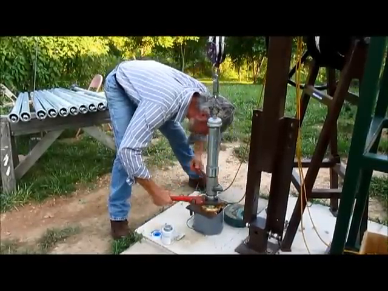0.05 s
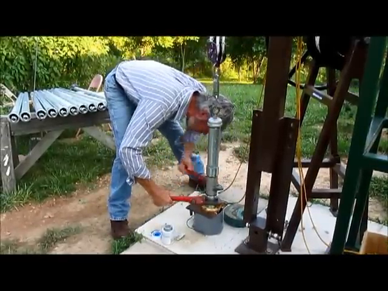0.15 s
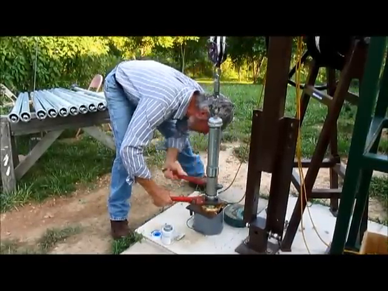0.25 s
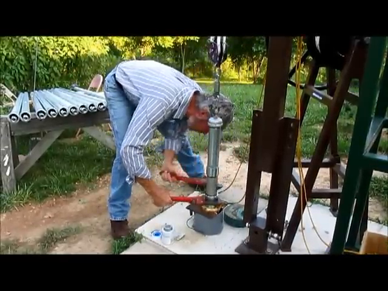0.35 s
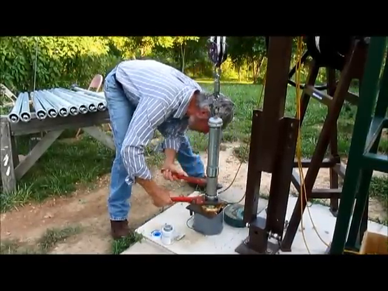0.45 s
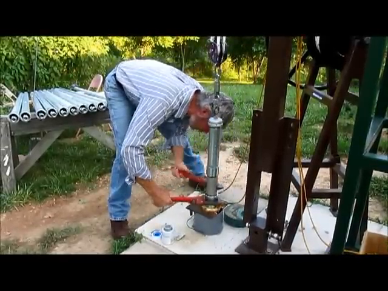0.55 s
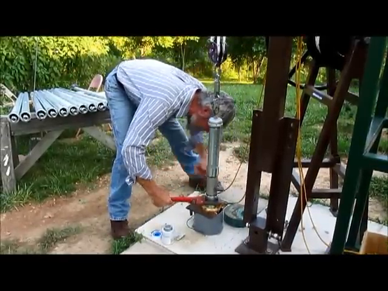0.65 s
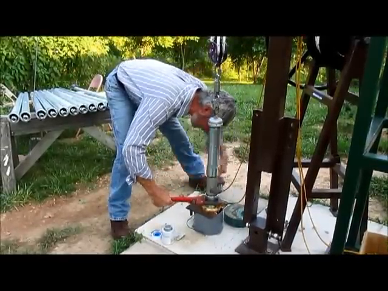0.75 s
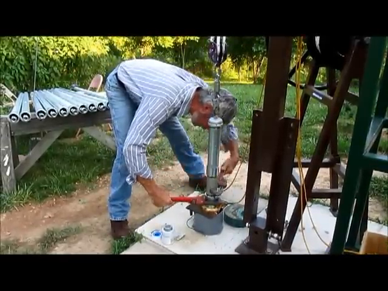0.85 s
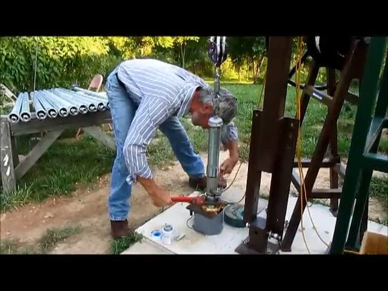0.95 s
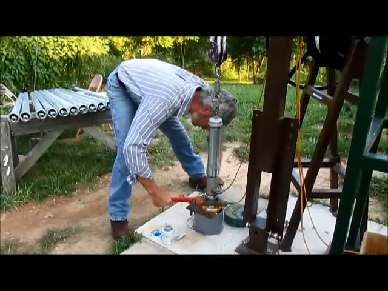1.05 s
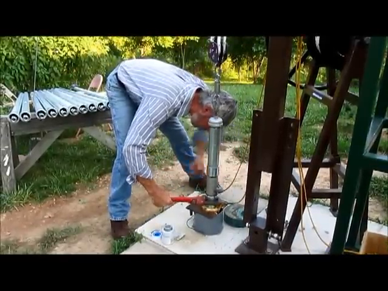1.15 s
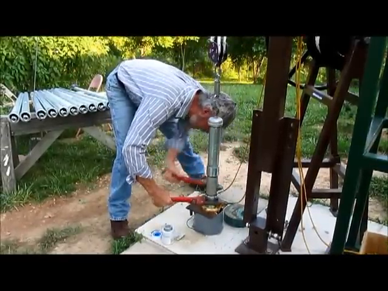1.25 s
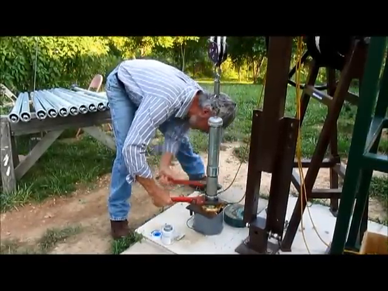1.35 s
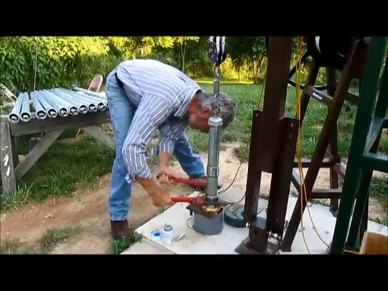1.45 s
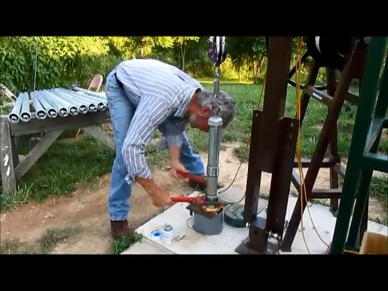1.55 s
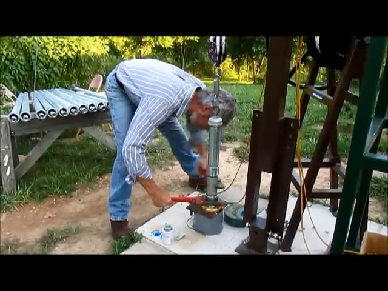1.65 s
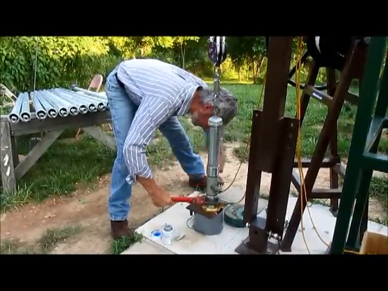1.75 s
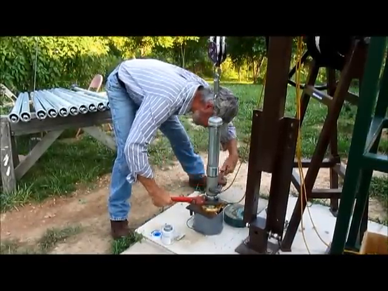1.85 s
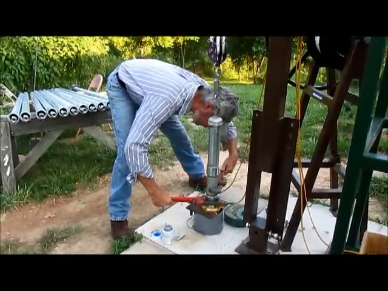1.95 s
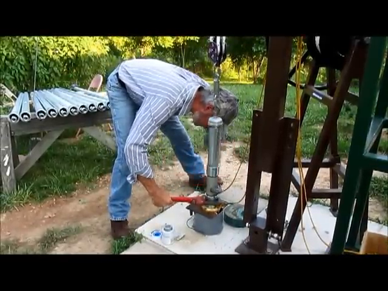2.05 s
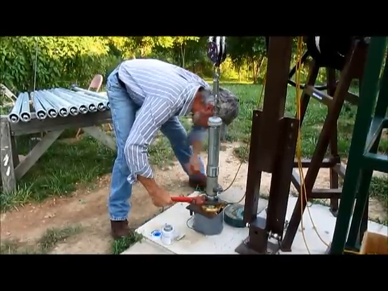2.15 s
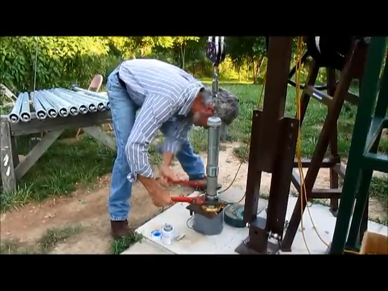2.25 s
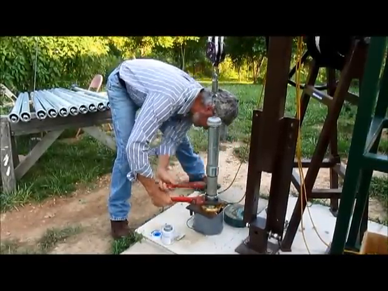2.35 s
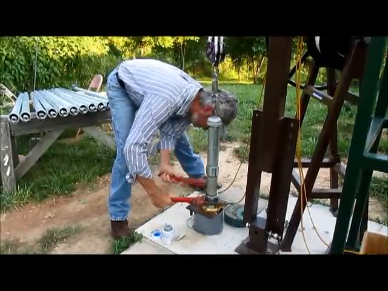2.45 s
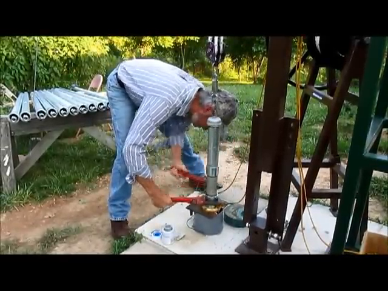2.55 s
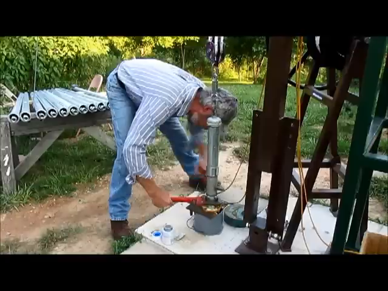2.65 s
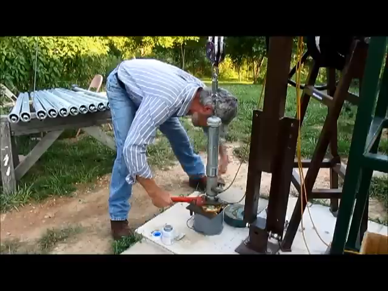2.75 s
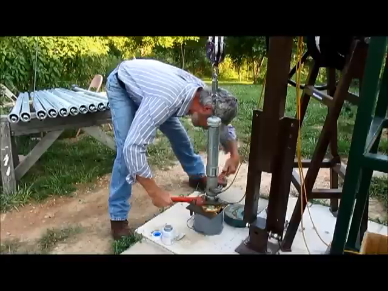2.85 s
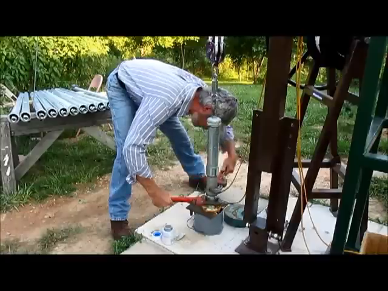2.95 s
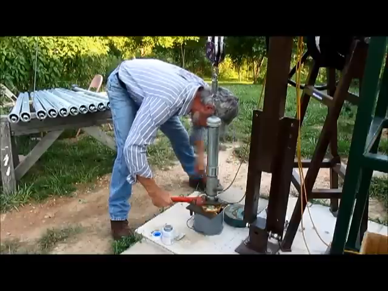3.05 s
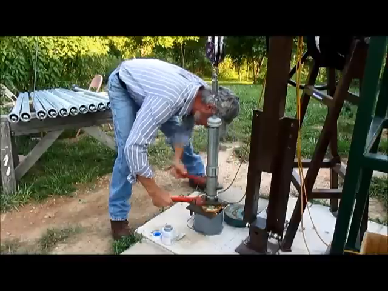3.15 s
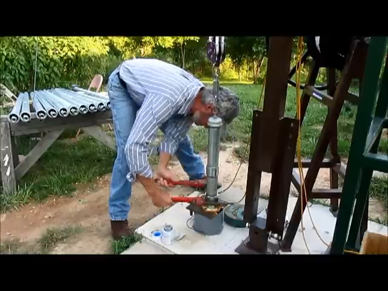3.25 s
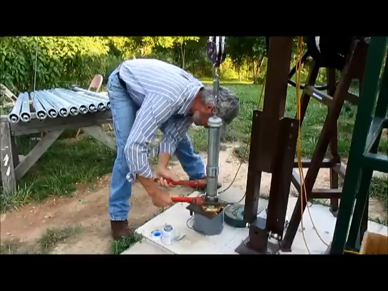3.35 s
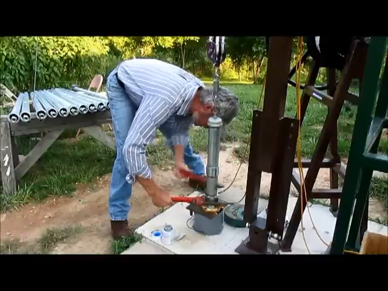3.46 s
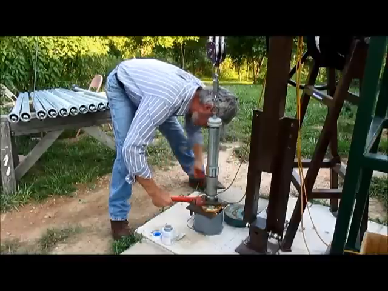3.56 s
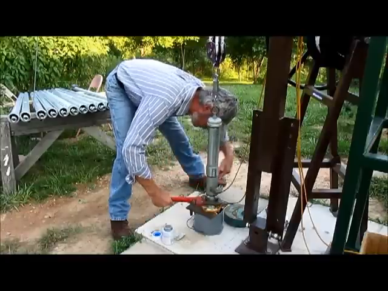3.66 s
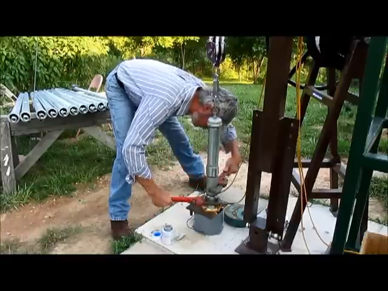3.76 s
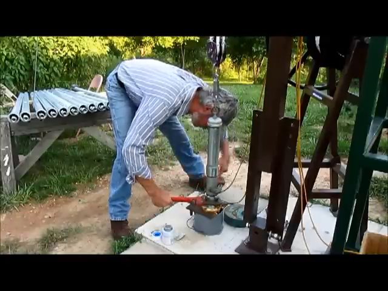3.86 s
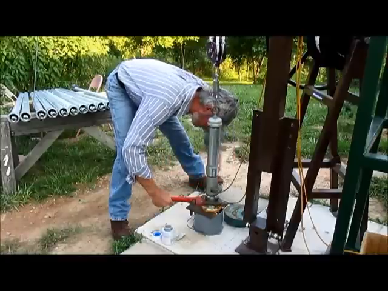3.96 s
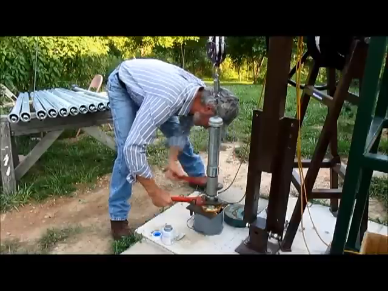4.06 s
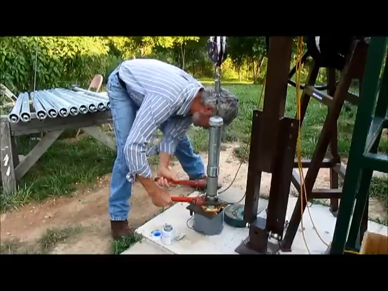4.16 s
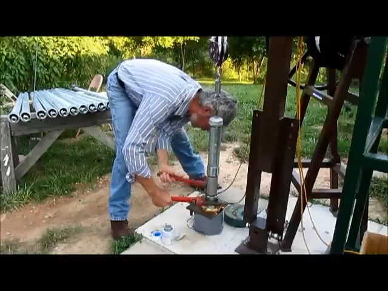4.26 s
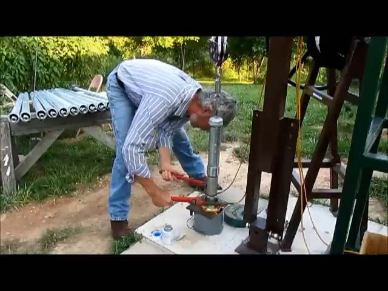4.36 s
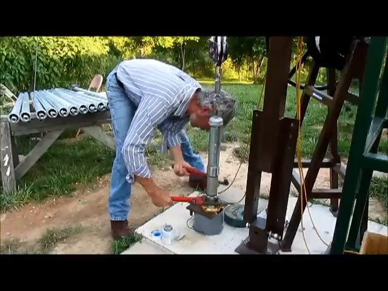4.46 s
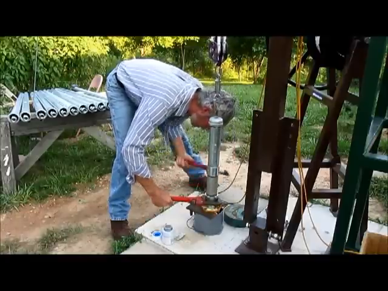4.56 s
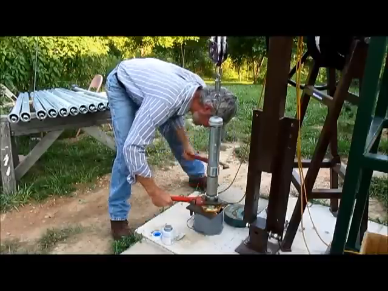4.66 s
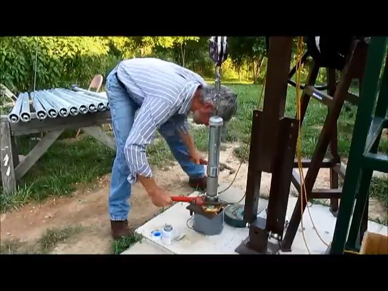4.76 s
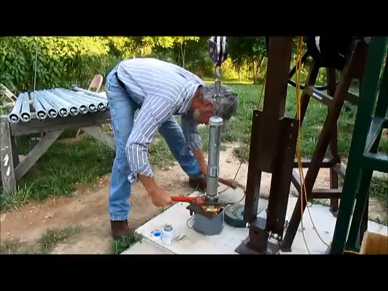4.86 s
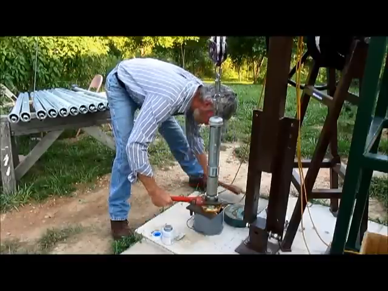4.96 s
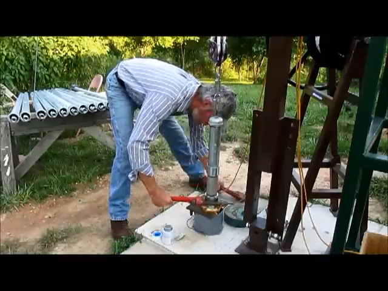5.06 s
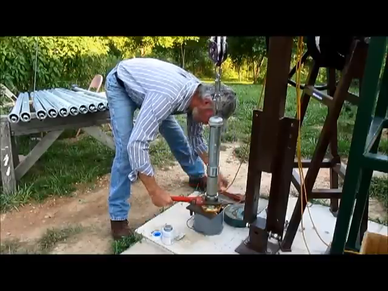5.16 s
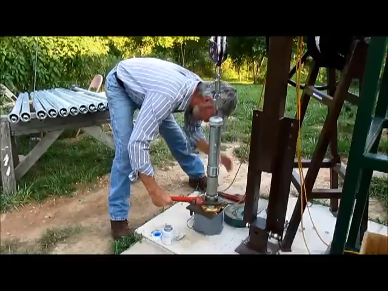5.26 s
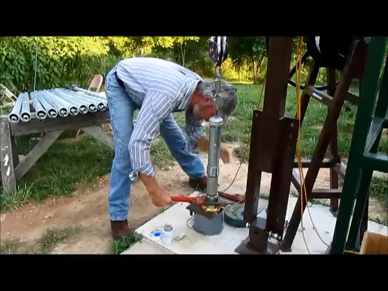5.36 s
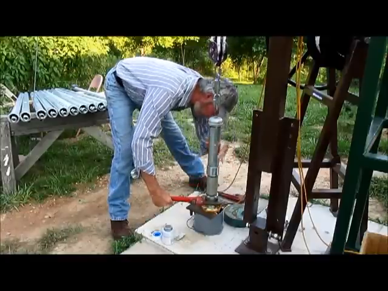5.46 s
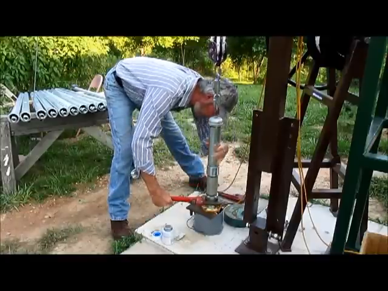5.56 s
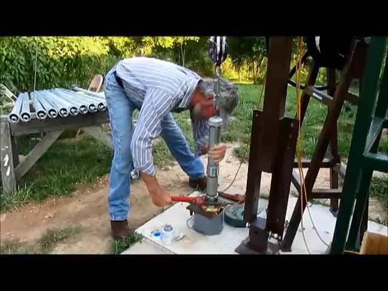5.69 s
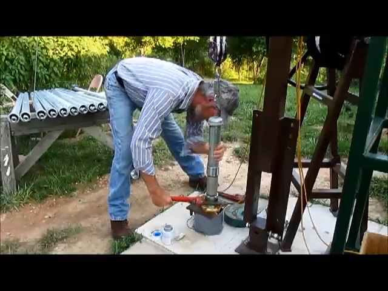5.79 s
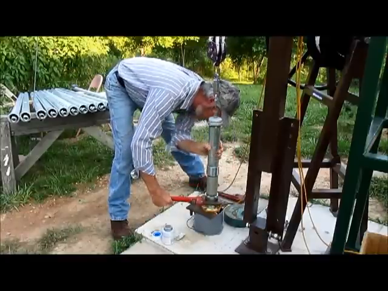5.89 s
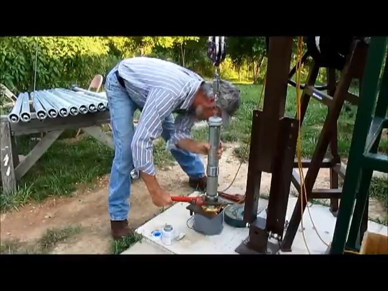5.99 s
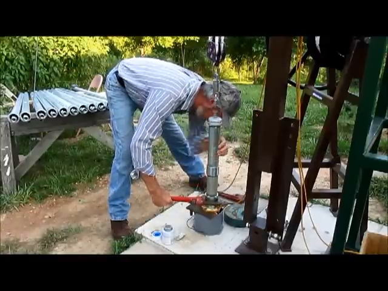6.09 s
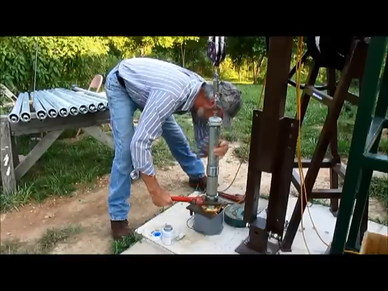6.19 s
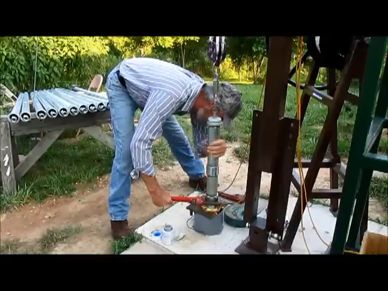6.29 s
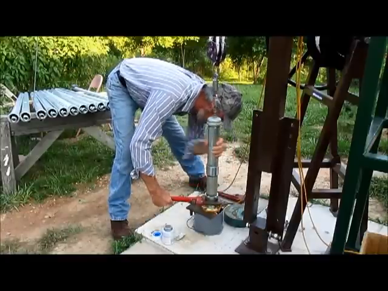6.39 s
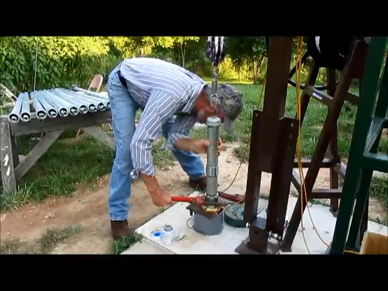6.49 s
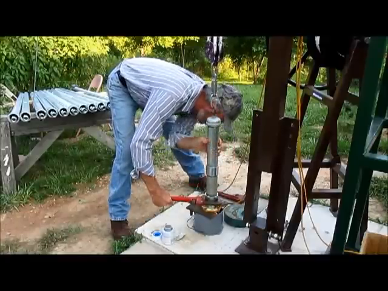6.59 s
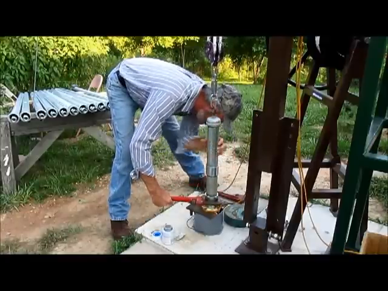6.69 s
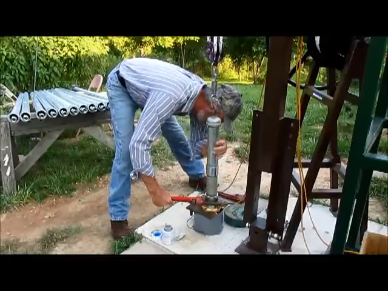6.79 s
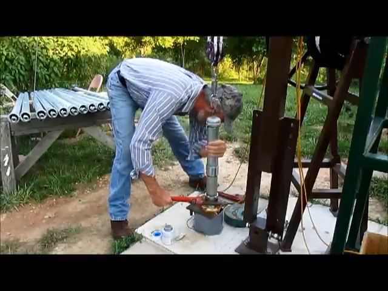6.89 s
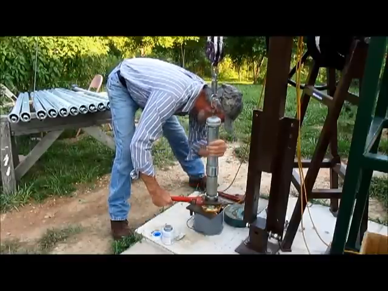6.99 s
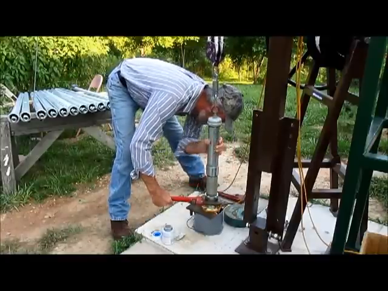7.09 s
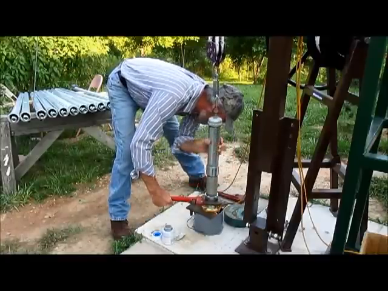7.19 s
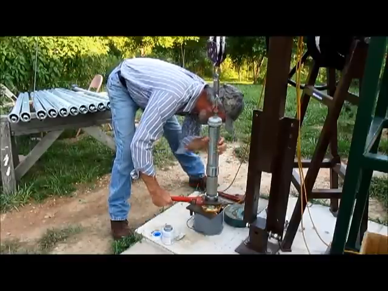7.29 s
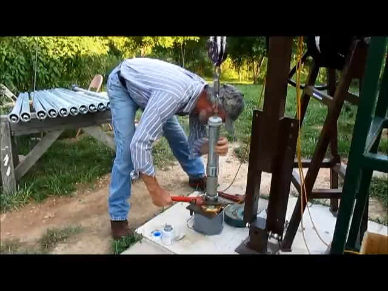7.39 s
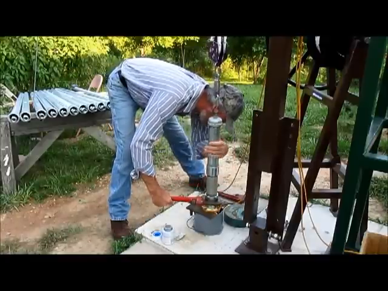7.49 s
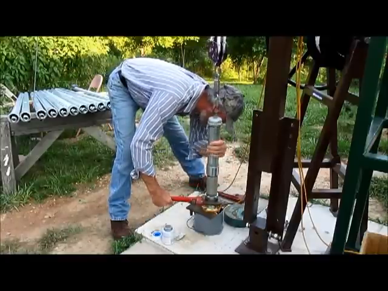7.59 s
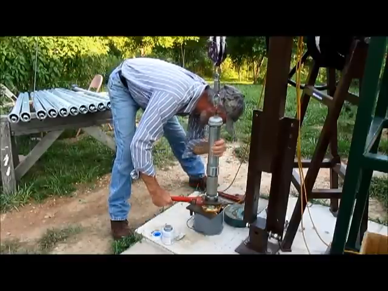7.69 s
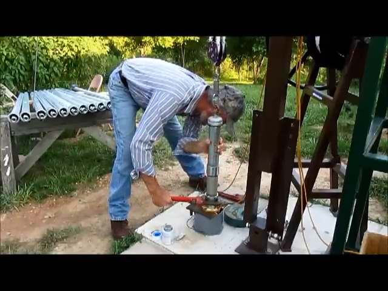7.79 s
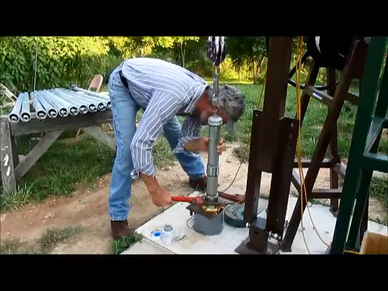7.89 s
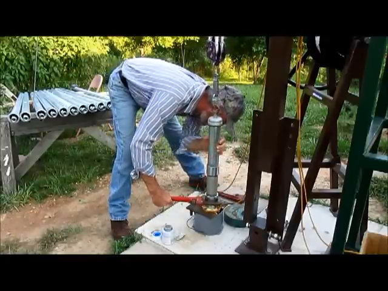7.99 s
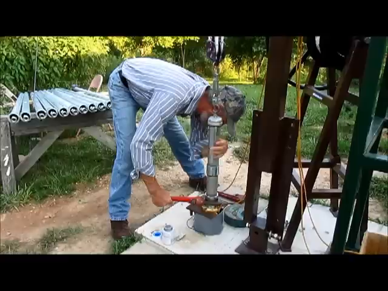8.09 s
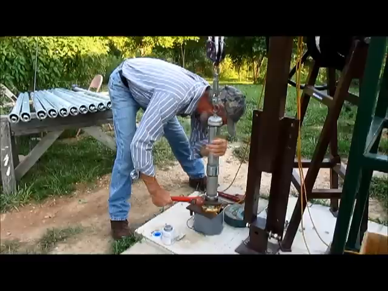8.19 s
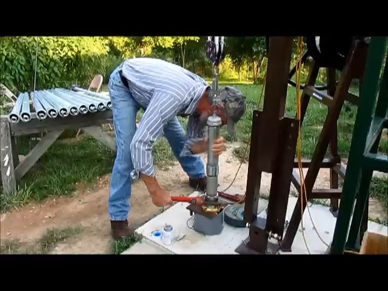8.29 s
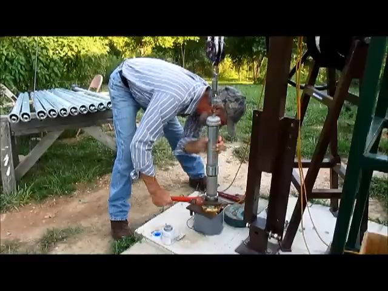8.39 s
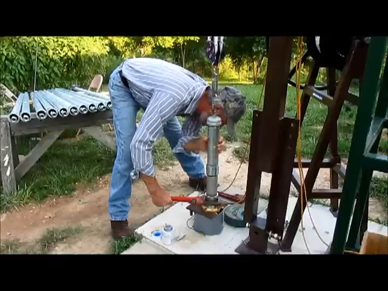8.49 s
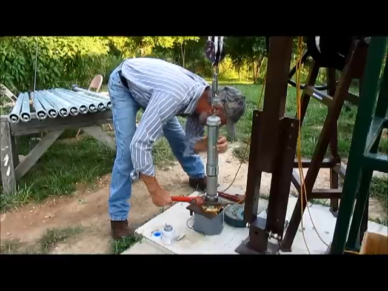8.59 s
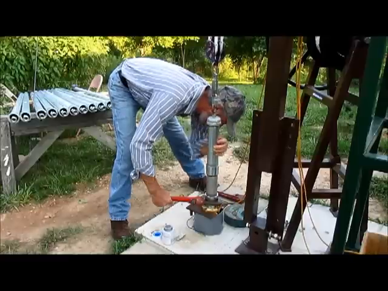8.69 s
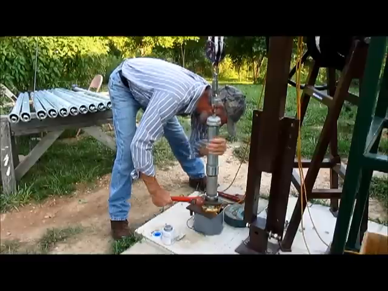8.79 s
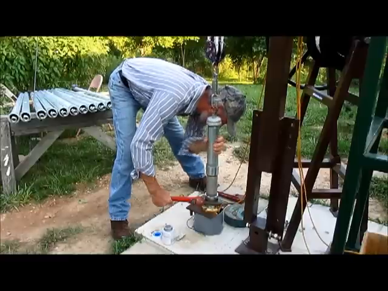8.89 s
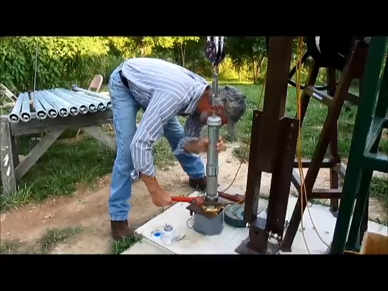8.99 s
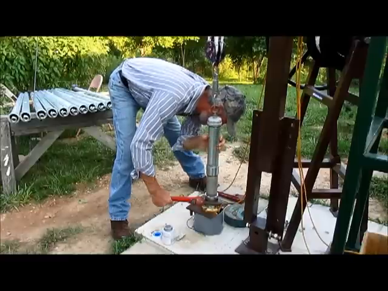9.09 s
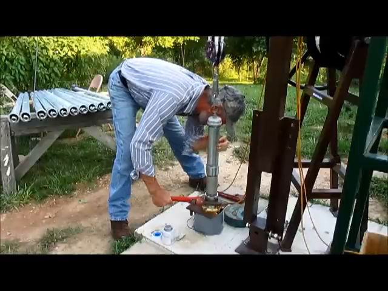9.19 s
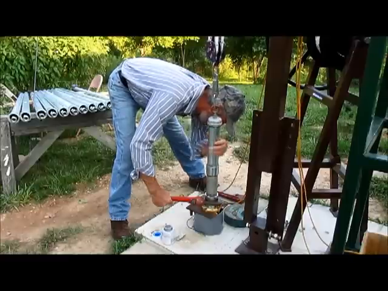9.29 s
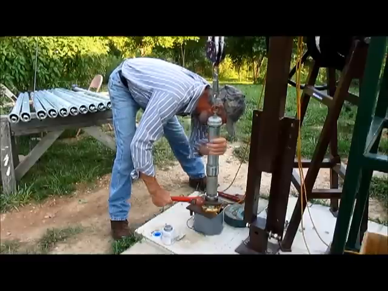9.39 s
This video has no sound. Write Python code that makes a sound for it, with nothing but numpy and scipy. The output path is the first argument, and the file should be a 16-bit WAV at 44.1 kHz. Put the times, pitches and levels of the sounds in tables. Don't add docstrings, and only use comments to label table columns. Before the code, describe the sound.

Crickets trill steadily over soft leafy air and a low hum. Close by, a pipe wrench bites, skids and clanks on a steel pipe in four uneven hauls. It drops hard on concrete with a bright ring and quick bounces. Then a hand spins a loose fitting in short, quieter grinding and knocking turns, ending with a sharp clank. Small stereo camera a few metres away, outdoors.

```python
import sys
import numpy as np
from scipy import signal
from scipy.fft import rfft, irfft
from scipy.io import wavfile
from scipy.ndimage import uniform_filter1d

SR = 44100
rng = np.random.default_rng(int(sys.argv[2]) if len(sys.argv) > 2 else 0)


def ratio(d):
    e = np.asarray(d, float) / 20
    return 10 ** e


def dump_mix(stems):
    frames = np.atleast_2d(stems).T
    limited = np.clip(frames, -1, 1)
    pcm = np.round(limited * 32767).astype(np.int16)
    wavfile.write(sys.argv[1], SR, pcm)


N = 416289

# f/Hz, level/dB, T60/s
PIPE_MODES = [(239, 2.5, 0.079), (400, -11, 0.27), (508, 2, 0.057), (791, 1.5, 0.066), (983, 0.5, 0.063),
              (1306, 8.5, 0.0085), (1847, 4.5, 0.0074), (2590, -27, 0.0038), (2463, -3.5, 0.058),
              (3200, 3.5, 0.0088), (3650, 0.5, 0.025), (3947, -2.5, 0.028), (4420, -10, 0.021),
              (4963, -2, 0.016), (5210, -4.5, 0.026), (5980, -15, 0.046), (6970, -6, 0.013)]
# f/Hz, level/dB, T60/s
FITTING_MODES = [(242, -2.5, 0.043), (420, -10, 0.024), (527, -1.5, 0.074), (784, -4, 0.1),
                 (1040, -11, 0.039), (1230, 6, 0.025), (1570, -5, 0.039), (1890, -0.5, 0.019),
                 (2157, -24, 0.18), (2920, 3, 0.0093), (3180, -13.5, 0.083), (3340, -6, 0.038),
                 (4040, -8, 0.043), (4660, -14, 0.01), (5270, -40, 0.027)]


def level(x, db):
    return x * ratio(db) / np.sqrt(np.mean(x ** 2))


def band(x, lo_hz, hi_hz):
    return signal.sosfilt(signal.butter(2, [lo_hz, hi_hz], "bandpass", fs=SR, output="sos"), x)


def decay(t, t60):
    return np.exp(-np.log(1000) * t / t60)


def ring(x, modes, damp):
    out = 0
    for hz, db, t60 in modes:
        q = max(hz * t60 * damp / 2.68, .5)
        out = out + ratio(db) * signal.lfilter(*signal.iirpeak(hz, q, fs=SR), x)
    return out


def walk(rate):
    k = int(SR / rate)
    held = np.repeat(rng.standard_normal(N // k + 1), k)
    return 1.3 * uniform_filter1d(uniform_filter1d(held, k), k)[:N]


def ports(x, lag, pan_db):
    late = irfft(rfft(x) * np.exp(-2j * np.pi * np.arange(N // 2 + 1) * lag / N), N)
    return np.array([late * ratio(pan_db / 2), x * ratio(-pan_db / 2)])


def add(out, s, x):
    i = int(s * SR)
    out[i:i + len(x)] += x[:N - i]


def hits(events, modes, crack_db, tail_ms, spot_db, spot_t60, top_db, flank_db, overtone_db=-60):
    strike, scatter_db, overtone = 5, 3, 1.92
    out, t = np.zeros(N), np.arange(SR // 6) / SR
    hz, db, t60 = np.transpose(modes)[:, :, None]
    for s, peak_db, body_db, edge_db, spot_hz, contact_ms in events:
        chance = rng.standard_normal((2, len(hz), 1))
        grit = rng.standard_normal(len(t))
        tones = ratio(db + scatter_db * chance[0]) * np.sin(2 * np.pi * hz * (1 + 0.016 * chance[1]) * t)
        spot = np.sin(2 * np.pi * spot_hz * t)
        spot = spot + ratio(overtone_db) * np.sin(2 * np.pi * overtone * spot_hz * t)
        response = np.sum(tones * decay(t, t60), axis=0) + ratio(spot_db) * spot * decay(t, spot_t60)
        force = grit * np.exp(-np.maximum(t * 1000 - contact_ms, 0) / tail_ms)
        force[0] += strike
        blow = signal.fftconvolve(force, response)[:len(t)] + ratio(crack_db) * force
        bands = ((360, 2640, body_db + flank_db), (1557, 5440, peak_db),
                 (3600, 7020, edge_db + flank_db), (6560, 11700, edge_db + top_db))
        for lo_hz, hi_hz, part_db in bands:
            part = band(blow, lo_hz, hi_hz)
            add(out, s - .0006, part * ratio(part_db) / np.max(np.abs(part)))
    return out


def effort(row, t):
    grip, release, start_db, end_db = row[:4]
    grip_db_per_s, release_db_per_s = 1502, 291
    load_db = np.interp(t, [grip, release], [start_db, end_db])
    load_db = load_db - grip_db_per_s * np.maximum(grip - t, 0)
    return load_db - release_db_per_s * np.maximum(t - release, 0)


def scrape(pulls, modes, slips, grit_db, damp, under_db, grind_hz, chatter_hz, patchy_db):
    size = ratio(grit_db * rng.exponential(size=N)) * rng.standard_normal(N)
    force = (rng.random(N) < slips / SR) * size
    body = ring(force * ratio(patchy_db * walk(60)), modes, damp)
    t = np.arange(N) / SR
    loads = [ratio(effort(row, t)) for row in pulls]
    grind = sum(loads)
    chatter = sum(ratio(row[-1]) * load for row, load in zip(pulls, loads))
    low = level(band(band(body, *grind_hz), *grind_hz), under_db)
    high = level(band(body, *chatter_hz), under_db)
    return grind * low + chatter * high


def crickets():
    # stroke/ms, level/dB, weak stroke/dB, left minus right/dB, left lag/samples
    singers = [(6.5, -46, -5.5, -3.5, -0.15), (3.1, -51.5, -25, 7.5, 0.5), (3.6, -84, 6, -17, 3),
               (3.1, -55.5, 18, -5.5, -1.5), (9.1, -63, -10, 20.5, 2.5), (3, -74, 10, -24.5, -8),
               (2.4, -63, -7.5, -5.5, 1.5)]
    # wing f/Hz, stroke rate/Hz
    songs = [(7420, 47.2), (7560, 74), (7680, 60.5), (7350, 119), (8150, 84), (5250, 66), (3420, 150)]
    out = 0
    for (hz, rate), (ms, db, weak_db, pan_db, lag) in zip(songs, singers):
        beat = np.cumsum(rate * (1 + 0.021 * walk(3) + 0.0397 * walk(30))) / SR
        stroke = beat.astype(int)
        since = beat % 1 / rate * 1000 / ms
        chance_db = 2.8 * rng.standard_normal(N // 100)[stroke] + 1.7 * walk(1.785)
        size = ratio(weak_db * (stroke % 2) + chance_db)
        sag = 0.0086 * (np.minimum(since, 2) - 1)
        wing = np.sin(2 * np.pi * np.cumsum(hz * (1 + 0.0098 * walk(15) - sag)) / SR)
        song = size * since * np.exp(-1.6 * since ** 2) * wing
        out = out + ports(level(song, db), lag, pan_db)
    return out


def field():
    # f/Hz, spectral level/dB
    air = [(15, -42), (25, -9.5), (76, 1.5), (273, -3), (395, -4), (547, -4), (723, -1.5), (1500, -10),
           (2300, -18.5), (2900, -14), (3340, -8), (3930, -7.5), (5320, -2.5), (6400, -2.5), (8320, -32),
           (14100, -120)]
    # f/Hz, spectral level/dB
    chorus = [(5800, -47), (6400, -26.5), (7000, -4.5), (7500, 0), (8300, -8.5), (8900, -18), (9500, -30),
              (10900, -58), (11200, -26.5), (15400, -25.5), (16000, -45)]
    # f/Hz, level/dB
    width = [(60, -1), (110, -1), (200, 2), (380, 0.5), (700, -3.5), (1290, -2), (2380, -2), (4400, -1.5),
             (8120, -2), (15000, -0.5)]
    air_db, chorus_db, flicker_db = -52, -48, 1.3
    log_hz = np.log(np.arange(N // 2 + 1) * SR / N + 1)

    def colour(table):
        hz, db = np.transpose(table)
        return ratio(np.interp(log_hz, np.log(hz), db))

    def flickering(tone):
        out = 0
        for centre in range(3, 11):
            window = np.clip(1 - np.abs(log_hz - centre), 0, 1)
            noise = irfft(tone * rfft(rng.standard_normal(N)) * window, N)
            out = out + noise * ratio(flicker_db * walk(3.892))
        return out

    shape = 0
    for table, db in ((air, air_db), (chorus, chorus_db)):
        shape = shape + ratio(db) * colour(table) / np.linalg.norm(colour(table))
    mid, side = flickering(shape), flickering(shape * colour(width))
    return np.sqrt(N) * np.array([mid + side, mid - side])


def ducking(t):
    drop_s, field_db = 5.12, -2.5
    depth_db, fall_s, back_s = -23.5, 0.15, 0.54
    since = np.maximum(t - drop_s, 0)
    return ratio(field_db + depth_db * (np.exp(-since / back_s) - np.exp(-since / fall_s)))


def living_field():
    # t/s, share gone (0-1)
    hush = [(8.72, 0), (8.76, .42), (9.44, .42)]
    t = np.arange(N) / SR
    living = crickets() + field()
    low_insects = signal.butter(3, [2500, 6900], "bandpass", fs=SR, output="sos")
    living -= np.interp(t, *np.transpose(hush)) * signal.sosfiltfilt(low_insects, living)
    return ducking(t) * living


def clanks():
    # t/s, peak level/dB, crack level/dB, rise/ms
    blows = [
        (0.5976, -14, -20, .8),
        (4.2281, -12.5, -12.5, 0.26),
        (9.2218, -12.5, -2.5, .9),
        (1.8225, -12, -22, 1.2),
    ]
    # f/Hz, level/dB, T60/s
    handle = [(490, -11.5, 0.11), (770, -9, 0.043), (1380, 6.5, 0.023), (1820, -10.5, .05),
              (1920, -3, 0.034), (2320, -3, 0.022), (2740, -9, .025), (3500, -13, .025), (3800, -6, .02),
              (4660, -8, .03)]
    hook = [(990, -17.5, 0.083), (1280, -3.5, .03), (1878, -6, 0.033), (2600, 2.5, 0.023), (3270, 3, 0.018),
            (3900, -2, .02), (4530, -10, 0.014), (4960, -9, 0.037)]
    collar = [(830, -11, 0.075), (1000, -16, 0.38), (1277, -11, 0.09), (1615, -9, 0.1), (2100, -10, 0.18),
              (2470, -1, 0.04), (2820, -3, .04), (3080, -5, 0.13), (3300, 2.5, .03), (3650, 0, 0.045),
              (4070, 7, 0.039), (4970, 9, 0.042)]
    jaw = [(500, -14, .06), (760, 0, .04), (980, -2, .06), (1250, -10, .03), (2450, -14, .05),
           (3500, -16, .02)]
    out, t = np.zeros(N), np.arange(SR // 3) / SR
    for (s, peak_db, crack_db, rise_ms), modes in zip(blows, (handle, hook, collar, jaw)):
        hz, db, t60 = np.transpose(modes)[:, :, None]
        tones = ratio(db) * np.sin(2 * np.pi * (hz * t + rng.random(hz.shape))) * decay(t, t60)
        crack = ratio(crack_db) * 4 * band(rng.standard_normal(len(t)), 900, 6000) * np.exp(-t / 0.006)
        blow = np.minimum(t * 1000 / rise_ms, 1) * (np.sum(tones, axis=0) + crack)
        add(out, s, blow * ratio(peak_db) / np.max(np.abs(blow)))
    return out


def hauls():
    # grip t/s, release t/s, grind level/dB at grip, at release, chatter over grind/dB
    pulls = [(.605, .63, -34, -56.5, -3), (.64, .95, -48.5, -30.5, -7), (1.41, 1.49, -50.5, -53, -6.5),
             (1.74, 1.84, -48, -34, -3), (1.86, 1.9, -36, -29, -6), (1.92, 1.99, -36, -37.5, -14),
             (2.62, 2.945, -46, -34, -4), (3.535, 3.58, -40, -41, -0.5), (3.62, 3.87, -42, -33, -4),
             (4.462, 4.48, -46, -51.5, 1)]
    swings = [
        (1.053, 1.297, -60, -60, -16),
        (2.2, 2.447, -58.5, -52, -2),
        (3.15, 3.314, -60, -54, -2),
        (3.932, 4.182, -52, -63, -9),
    ]
    return scrape(pulls + swings, PIPE_MODES, slips=2900, grit_db=1.5, damp=0.42, under_db=-2.0,
                  grind_hz=(140, 900), chatter_hz=(2050, 7300), patchy_db=2.6)


def jaws():
    # t/s, peak level/dB, body level/dB, edge level/dB
    seats = [(0.7602, -42, -34, -54), (0.7897, -39, -40, -54), (0.8173, -28, -25.5, -56),
             (0.8458, -38, -23.5, -49), (0.9048, -19, -31, -43), (0.962, -36, -28, -22.5),
             (0.9803, -41, -25.5, -39), (0.9991, -34, -26.5, -51), (1.7769, -27.5, -32, -55),
             (1.832, -26, -26, -36), (1.9674, -19.5, -18.5, -44), (2.0288, -42, -30.5, -55),
             (2.6003, -40, -36, -42), (2.7988, -28.5, -33, -57), (2.9752, -23.5, -40, -34),
             (3.486, -42, -45, -57), (3.6584, -24, -26.5, -44), (.9485, -40, -20.5, -40),
             (3.650, -40, -29, -52), (3.698, -44, -28, -50), (3.871, -38, -30, -36), (5.045, -44, -43, -48)]
    # t/s, peak level/dB, body level/dB, edge level/dB
    teeth = [(1.9371, -24, -35, -32), (2.6822, -36, -54, -50), (2.7093, -27, -31.5, -36),
             (2.742, -43, -24, -31.5), (2.8584, -19.5, -37, -38), (3.5465, -24.5, -36, -26),
             (4.4535, -41, -48, -51), (4.4899, -34.5, -44, -43), (4.5024, -37, -50, -48),
             (4.535, -40.5, -59, -55)]
    # t/s, peak level/dB, body level/dB, edge level/dB, ring f/Hz
    clinks = [(.726, -27, -26.5, -42, 3460), (1.5778, -28.5, -36.5, -30.5, 1260),
              (1.9501, -17, -28, -21, 1650), (2.4792, -20.5, -37, -23, 3340), (2.5044, -34, -37, -52, 1220),
              (3.3366, -37.5, -44, -49, 3230), (3.364, -47, -54, -42, 1200),
              (3.5434, -23, -39, -27.5, 4900), (3.6748, -39, -20.5, -46, 1070),
              (3.8831, -16, -25, -19.5, 4900), (3.9364, -27, -51, -57, 1210),
              (4.896, -38.5, -42.5, -38, 3400)]
    bounces = [(5.134, -22, -38, -25, 5100), (5.186, -41.5, -54, -44, 2590), (5.336, -19, -30, -17.5, 4200),
               (5.344, -20, -28, -24, 1100), (5.367, -24, -29, -19, 2390), (5.4512, -37, -44, -40, 600),
               (5.62, -48, -64, -54, 4050)]
    ticks = [(0.7612, -34, -46, -48, 3200), (0.7894, -31.5, -46, -46, 3200), (.8173, -21, -38, -42, 3280),
             (.8458, -32, -42, -43, 2480), (0.866, -19, -34, -20.5, 4820), (.9345, -22, -19, -28, 800),
             (0.9985, -25.5, -46, -40, 3300), (1.8228, -21, -40, -30, 2450), (2.741, -27, -37, -36, 2520),
             (3.8057, -21.5, -31, -26, 3600)]
    # t/s, peak level/dB, body level/dB, edge level/dB, contact/ms
    skids = [(0.8588, -17.5, -35, -26, 11.5), (0.9304, -27, -22.5, -29, 15), (1.633, -18, -36, -22, 2.5),
             (1.6445, -20, -28, -31, 4.3), (1.6536, -16, -26, -20.5, 14), (1.6626, -24, -27, -35, 11),
             (1.894, -16.5, -30, -26.5, 12), (2.6295, -22.5, -33, -28, 5), (2.843, -22, -34, -32, 5),
             (2.8856, -25, -35, -27, 41), (2.9111, -20.5, -25, -34, 25), (2.9386, -21.5, -54, -24, 19.5),
             (3.5336, -33, -45, -45, 35), (3.7294, -26.5, -30, -34, 26), (3.7706, -28, -48, -35, 11),
             (3.8017, -26.5, -36, -27, 29), (3.8401, -12, -22.5, -17, 11), (3.8507, -16, -26, -18.5, 7.5),
             (3.860, -12.5, -29, -22, 1), (.872, -23, -29, -36, 21)]
    bites = [row + (838, 4.4) for row in seats] + [row + (2596, 3.4) for row in teeth]
    clicks = [row + (0.67,) for row in clinks + bounces + ticks]
    slides = [row[:4] + (2522,) + row[4:] for row in skids]
    bite = hits(bites, PIPE_MODES, crack_db=29.0, tail_ms=4.2, spot_db=11.0, spot_t60=0.028,
                top_db=-15, flank_db=1.0)
    click = hits(clicks, PIPE_MODES, crack_db=29, tail_ms=2.5, spot_db=12, spot_t60=.011,
                 top_db=-19.0, flank_db=1.5)
    slide = hits(slides, PIPE_MODES, crack_db=29.5, tail_ms=4, spot_db=12.0, spot_t60=0.022,
                 top_db=-15.0, flank_db=2.0, overtone_db=-11)
    return bite + click + slide


def fitting_knocks():
    # t/s, peak level/dB, body level/dB, edge level/dB, ring f/Hz
    knocks = [(6.59, -46, -40, -56, 1200), (6.6665, -52, -50, -56, 600), (7.2449, -34, -36, -51, 1040),
              (7.2832, -37, -32.5, -41, 1050), (7.7675, -38, -36.5, -45, 1260),
              (7.8788, -29.5, -33, -55, 1100), (7.9086, -34, -34.5, -40, 1160),
              (7.967, -32.5, -36, -46, 1200), (8.0304, -29.5, -37, -47, 800), (8.4345, -35, -36, -41, 1220),
              (8.55, -42, -54, -46, 1140), (8.5974, -31.5, -33, -61, 1230), (8.6206, -38, -38, -53, 1150),
              (7.26, -44, -35, -56, 1030), (9.0895, -35.5, -44, -58, 3090), (9.1403, -41, -42, -58, 2900),
              (9.105, -39, -35.5, -58, 1170), (3.678, -24, -50, -45, 2820), (3.94, -33, -36, -57, 1020),
              (2.0, -45, -33, -55, 1030)]
    contact_ms = 5.6
    return hits([row + (contact_ms,) for row in knocks], FITTING_MODES, crack_db=26.5, tail_ms=4.4,
                spot_db=10.0, spot_t60=0.043, top_db=-32, flank_db=2.6)


def drop():
    # t/s, blow level/dB, ring level/dB, free ring/s, level left once damped/dB
    landings = [
        (5.119, -4, 7, 0.0034, -30.5),
        (5.3310, -16, 4.5, .020, -52),
        (5.351, -11.5, 0.5, 0.056, -21),
        (5.4125, -9, 3, 0.022, -23),
    ]
    # f/Hz, T60/s, level/dB on each of the four landings
    wrench = [(2400, .12, -33, -36, -40, -42), (2616, .2, -52, -41, -41, -46),
              (3550, .11, -40, -43, -36, -33), (4200, .1, -42, -35, -40, -38),
              (4628, .4, -21, -31, -39, -35), (5028, .3, -33, -39, -42, -46),
              (5396, .7, -29, -38, -21, -32), (6105, .15, -32, -34, -39, -38),
              (7335, .3, -38, -22, -26, -20), (8180, .2, -36, -29, -39, -37),
              (10220, .1, -40, -38, -40, -46), (11550, .12, -48, -44, -56, -55),
              (12670, .4, -52, -51, -60, -39), (14180, .2, -34, -33, -46, -54)]
    crack_centres = [4900, 5560, 2200, 4440]
    thuds = [-8, -22, -17.5, -28]
    thud_leads = [.0018, 0.00246, 0.0007, 0.0029]
    pad_damping = [0.0063, .006, 0.0055, 0.0088]
    sparks = [-1, -8, -20, -12]
    ring_rise_s, rattle_db, rattle_s = .0015, -20, 0.043
    out, t = np.zeros(N), np.arange(SR // 2) / SR
    hz, t60, *mode_levels = np.transpose(wrench)[:, :, None]
    settings = zip(landings, crack_centres, mode_levels, thuds, thud_leads, pad_damping, sparks)
    for landing, crack_hz, db, thud_db, lead_s, damp_s, spark_db in settings:
        s, blow_db, ring_db, free_s, rest_db = landing
        tones = ratio(db + ring_db) * np.sin(2 * np.pi * hz * (t + int(s * SR) / SR)) * decay(t, t60)
        tones = np.minimum(t / ring_rise_s, 1) * tones
        damped = ratio(rest_db) + np.exp(-np.maximum(t - free_s, 0) / damp_s)
        grit = rng.standard_normal((3, len(t))) * np.minimum(t / 0.0025, 1)
        crack = 2.9 * band(grit[0], 0.87 * crack_hz, 1.39 * crack_hz)
        crack = crack + 1.23 * band(grit[0], crack_hz, 10600) + ratio(spark_db) * band(grit[0], 8400, 13800)
        crack = crack * np.exp(-t / 0.0027)
        rattle = band(grit[2], 600, 6000) * damped + 0.14 * band(grit[2], 9900, 13700)
        rattle = ratio(rattle_db) * rattle * np.exp(-t / rattle_s)
        thud = 7.9 * band(grit[1], 380, 1300) * np.exp(-t / 0.0021)
        thud = thud + 0.22 * band(grit[1], 70, 630) * np.exp(-t / 0.037)
        add(out, s, np.sum(tones, axis=0) * damped + ratio(blow_db) * (crack + rattle))
        add(out, s - lead_s, ratio(thud_db) * thud)
    return out


def hand_turns():
    # grip t/s, release t/s, grind level/dB at grip, at release, chatter over grind/dB
    turns = [(5.905, 6.0, -49.5, -44, -7), (6.45, 6.6, -59, -39.5, -6.5), (7.12, 7.15, -49, -51, -8),
             (7.2, 7.28, -49.5, -38, -6.5), (7.73, 8.046, -50.5, -46, -11), (8.385, 8.44, -51, -41.5, -1.5),
             (8.45, 8.52, -42, -40, -9.5), (8.55, 8.63, -48, -75, -20), (8.95, 9.02, -51, -42, -5),
             (9.085, 9.15, -40.5, -43, -4), (9.232, 9.3, -30.5, -49, -7.5)]
    return scrape(turns, FITTING_MODES, slips=5000, grit_db=0.1, damp=0.58, under_db=-6.0,
                  grind_hz=(170, 1600), chatter_hz=(2400, 4600), patchy_db=1.1)


def pings():
    # t/s, peak level/dB, body level/dB, edge level/dB, ring f/Hz, contact/ms
    dry_ticks = [
        (6.3732, -40, -46, -48, 2000, .4),
        (8.7109, -33, -42, -44, 2880, .6),
    ]
    return hits(dry_ticks, FITTING_MODES, crack_db=30, tail_ms=1.5, spot_db=4, spot_t60=.012,
                top_db=-15, flank_db=1.5)


def well_string(haul, knock, rub):
    # f/Hz, level/dB, T60/s
    string_modes = [(82, 15, .6), (335, 0, .5), (410, -2, .5), (1030, 3, .4), (2110, -6, .25),
                    (3000, -2, .15)]
    return ring(ratio(3) * haul + ratio(9) * knock + ratio(3.5) * rub, string_modes, 1.)


def yard(work):
    t = np.arange(SR // 4) / SR
    scatter = rng.standard_normal((2, len(t))) * decay(t, 0.21) * (t > .003)
    scatter = scatter / np.sqrt(np.sum(scatter[0] ** 2))
    return signal.fftconvolve(work[None], scatter, axes=1)[:, :N]


def scene():
    yard_db, work_lag, work_pan_db = -14, 0.99, -2
    living = living_field()
    haul, knock, rub = hauls(), fitting_knocks(), hand_turns()
    work = clanks() + haul + jaws() + knock + drop() + rub + pings()
    work = work + well_string(haul, knock, rub)
    return ports(work, work_lag, work_pan_db) + ratio(yard_db) * yard(work) + living


def low_pass(x):
    return signal.sosfilt(signal.butter(12, 17320, fs=SR, output="sos"), x)


def record(dry):
    return low_pass(dry)


dry = scene()
out = record(dry)
dump_mix(out)
```